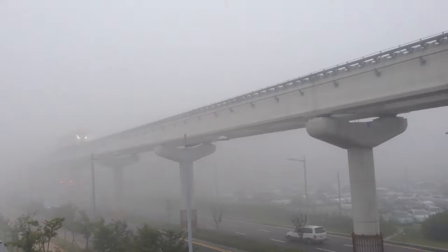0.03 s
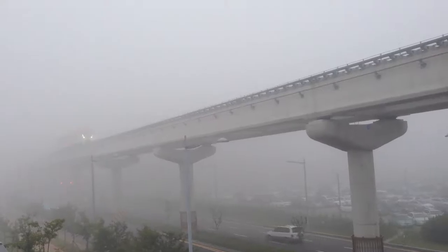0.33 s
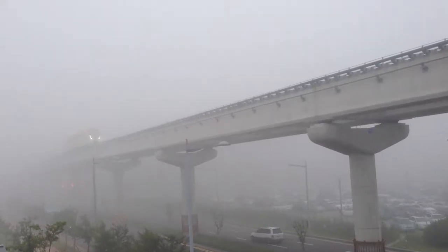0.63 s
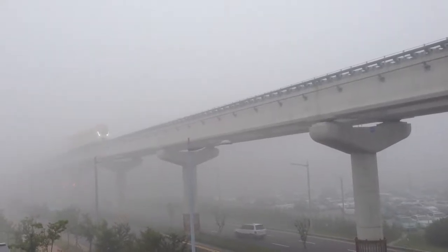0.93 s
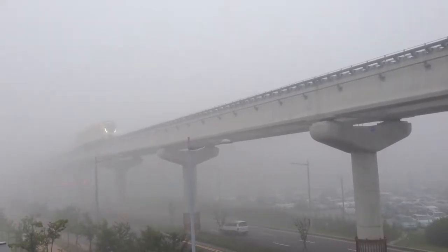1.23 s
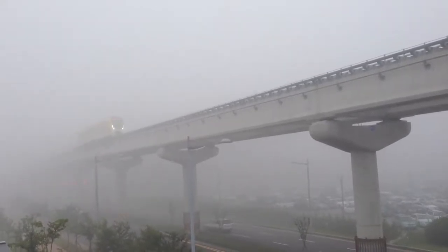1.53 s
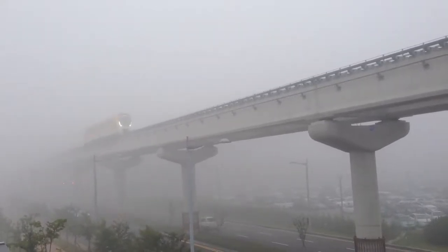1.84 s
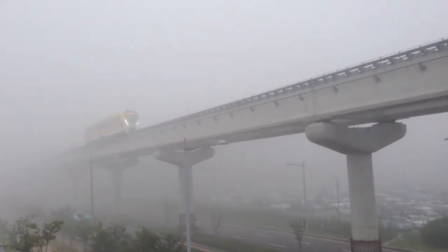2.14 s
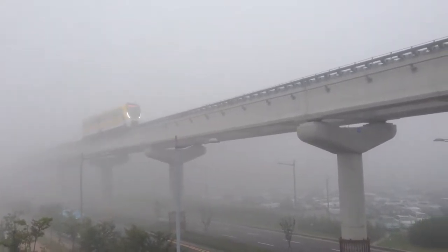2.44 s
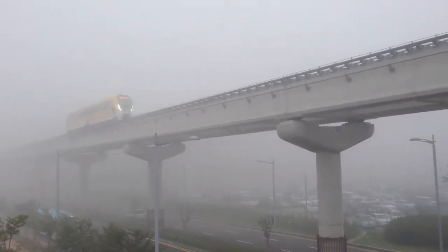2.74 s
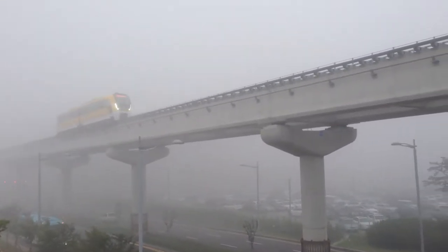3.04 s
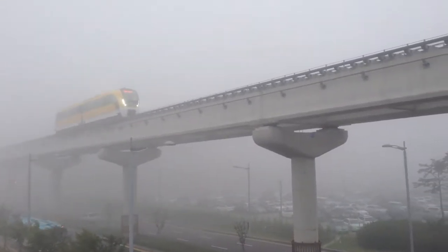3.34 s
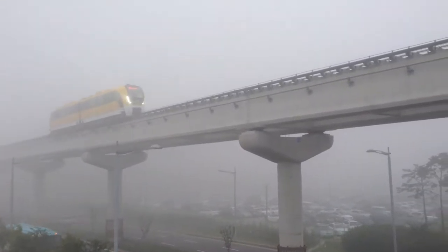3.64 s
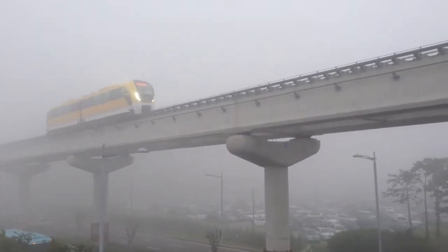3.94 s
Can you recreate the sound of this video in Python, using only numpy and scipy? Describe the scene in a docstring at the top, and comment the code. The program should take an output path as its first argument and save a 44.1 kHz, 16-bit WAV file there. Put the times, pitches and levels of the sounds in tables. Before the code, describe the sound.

A light train approaches on a raised track outdoors. At first a car's tyre hiss fades within a second into steady distant traffic. From about 1 second the train's rolling roar builds, with a low motor hum and wheels singing in surges. From 2.5 seconds it brightens with hiss, a thin high whine and faint squeaks, still growing at 4 seconds. Wind rumbles and bumps on the microphone throughout.

```python
"""Light train approaching in fog

A light train rolls closer on a viaduct: its roar grows and brightens, the motor hums, the wheels sing
on the track and a thin high whine breaks into squeaks. On the road beside it the tyre hiss of one car
fades into a steady rush of far traffic. Light wind rumbles and bumps on the microphone.
Rushes are coloured noise, hum and whine are narrow noise bands, squeaks and bumps are shaped sines."""
import sys
import numpy as np
from scipy import signal
from scipy.fft import rfft, irfft
from scipy.io import wavfile

SR = 44100
rng = np.random.default_rng(int(sys.argv[2]) if len(sys.argv) > 2 else 0)


def materialize(psi):
    """Save the field psi as 16-bit PCM at rate SR to the path in sys.argv[1].

    A 1-D psi becomes a single channel; in a 2-D psi each row is a channel.
    """
    bounded = np.clip(np.atleast_2d(psi).T, -1, 1)
    quanta = np.round(bounded * 32767).astype(np.int16)
    wavfile.write(sys.argv[1], SR, quanta)


N = 176400
T = np.arange(N) / SR


def from_db(db):
    """Decibels to gain."""
    return 10 ** (np.asarray(db) / 20)


def unit_rms(x):
    """Scale to rms 1."""
    return x / np.sqrt(np.mean(x ** 2) + 1e-20)


def automation(rows):
    """Breakpoints (time [s], values...) to one curve per value column, at every sample."""
    times, *columns = np.transpose(rows)
    return [np.interp(T, times, column) for column in columns]


def drift(rate_hz):
    """Smooth random wander of about rms 1, mostly slower than rate_hz."""
    hop, warm_up = 40, 2000
    pole = np.exp(-2 * np.pi * rate_hz * hop / SR)
    noise = rng.standard_normal(N // hop + warm_up + 2)
    slow = signal.lfilter([1], [1, -2 * pole, pole * pole], noise)[warm_up:]
    return np.interp(np.arange(N) / hop, np.arange(len(slow)), unit_rms(slow))


def rush(spectrum, flutter_db, flutter_hz):
    """Coloured noise whose octaves waver, partly together, in the moving air; rms 1."""
    hz, db = np.transpose(spectrum)
    octave = np.log2(np.maximum(np.fft.rfftfreq(N, 1 / SR), 1))
    low_cut_db = 18 * np.maximum(np.log2(hz[0]) - octave, 0)
    colour = from_db(np.interp(octave, np.log2(hz), db) - low_cut_db)
    noise = rfft(rng.standard_normal(N)) * colour
    together = drift(flutter_hz)
    out = np.zeros(N)
    for centre in range(4, 15):   # octave bands, 16 Hz to 16 kHz
        band = irfft(noise * np.maximum(1 - abs(octave - centre), 0), N)
        out += band * from_db(flutter_db * (together + drift(flutter_hz)))
    return unit_rms(out)


def narrow_noise(hz, width_hz):
    """A blurred tone: noise gathered around a pitch that may move; rms 1."""
    lowpass = signal.butter(3, width_hz / 2, fs=SR, output="sos")
    in_phase, quadrature = signal.sosfilt(lowpass, rng.standard_normal((2, N + SR)))[:, SR:]
    phase = 2 * np.pi * np.cumsum(hz * np.ones(N)) / SR
    return unit_rms(in_phase * np.cos(phase) + quadrature * np.sin(phase))


def train_roar():
    """The body of the train: a rolling roar that builds as it comes closer."""
    # colour of the roar (frequency [Hz], relative density [dB])
    spectrum = [(130, 3), (220, 3), (330, 2), (440, -3), (570, 1), (720, -2.5), (950, -2.5), (1200, -6),
                (1400, -7.5), (1650, -9), (2200, -16), (3000, -22), (5000, -36), (15000, -45)]
    # swell of the roar (time [s], level [dB])
    swell = [(.8, -49.5), (1.3, -45), (2, -41.5), (2.5, -41), (2.8, -38.5), (3.4, -38.5), (4, -38.5)]
    level_db, = automation(swell)
    return from_db(level_db) * rush(spectrum, flutter_db=1.07, flutter_hz=12.2)


def running_gear():
    """Bright hiss from the train's running gear, growing with the approach."""
    # colour of the hiss (frequency [Hz], relative density [dB])
    spectrum = [(1500, -47), (2300, 5), (2800, 3), (4300, 0.5), (6200, -3), (7500, -9), (10000, -12.5),
                (15000, -27)]
    # swell of the hiss (time [s], level [dB])
    swell = [(1.7, -66), (2.45, -62.5), (2.65, -57.5), (3, -56), (3.4, -57), (3.8, -52.5), (4, -52.5)]
    level_db, = automation(swell)
    return from_db(level_db) * rush(spectrum, flutter_db=1.0, flutter_hz=18)


def approach():
    """As the train nears, the track rings and a broad band brightens the roar."""
    # track resonances (centre [Hz], width [Hz], level at full swell [dB])
    resonances = [(1940, 140, -47), (430, 100, -47)]
    full_swell_s, rise_db_per_s = 4.11, 18.5   # still rising when the scene ends
    swell = from_db(-rise_db_per_s * np.maximum(full_swell_s - T, 0))
    ringing = sum(from_db(db) * narrow_noise(hz, width) for hz, width, db in resonances)
    brightness = from_db(-43) * narrow_noise(1950, width_hz=986)
    return swell * (brightness + ringing)


def motor_hum():
    """The motor's low, slightly sagging hum, with a breathier octave above it."""
    # fundamental (time [s], pitch [Hz], level [dB])
    fundamental = [(.1, 296.6, -54), (.6, 285.5, -44.5), (.72, 286.2, -51.5), (.9, 284.5, -46),
                   (1.15, 278.4, -54.5), (1.85, 276.9, -50.5), (2.6, 277.6, -51.5), (3.02, 279.8, -49),
                   (3.3, 277.6, -43), (3.6, 276.7, -51), (4, 280.6, -60)]
    # octave above (time [s], level [dB])
    octave_level = [(.1, -47.5), (.6, -62), (2.2, -64), (2.7, -50), (3.3, -50), (4, -68)]
    hz, hum_db = automation(fundamental)
    octave_db, = automation(octave_level)
    hum = from_db(hum_db) * narrow_noise(hz, width_hz=14.9)
    return hum + from_db(octave_db) * narrow_noise(2 * hz, width_hz=75)


def train_whine():
    """A thin, wandering whine on top of the train, wrapped in a band of hiss."""
    # whine (time [s], pitch [Hz], level of the core [dB])
    contour = [(1.8, 6300, -82), (2.25, 6195, -76), (2.48, 6240, -72), (2.7, 6240, -73), (2.86, 6122, -72),
               (3, 6080, -80), (3.4, 6150, -80), (3.8, 6250, -73), (4, 6200, -73)]
    hz, level_db = automation(contour)
    core = narrow_noise(hz, width_hz=150)
    halo = from_db(-1) * narrow_noise(6370, width_hz=840)
    return from_db(level_db) * (core + halo)


def wheel_song():
    """The wheels sing on the track in surges, creeping up in pitch."""
    # singing band (time [s], centre [Hz], level [dB])
    contour = [(.9, 1153, -57), (1.5, 1194, -49.5), (2.27, 1167, -53), (2.39, 1195, -45), (2.5, 1200, -56),
               (2.7, 1228, -48.5), (2.88, 1254, -56), (3.07, 1297, -45), (3.25, 1294, -55),
               (3.6, 1304, -50)]
    hz, level_db = automation(contour)
    return from_db(level_db) * narrow_noise(hz, width_hz=238)


def squeaks():
    """Faint, distant squeaks, each swelling and fading with an unsteady pitch; most glide."""
    # squeaks (peak time [s], level [dB], pitch [Hz], glide [Hz/s], swell half-width [s])
    cues = [(2.55, -59, 2700, 3002, .02), (2.87, -65.5, 5890, -800, .03), (2.944, -67, 6110, 0, .018),
            (3.152, -57, 3160, -2000, .014), (3.18, -71, 6000, 0, .025), (3.58, -55, 2970, -2, .014),
            (3.74, -63, 5820, 2000, 0.034), (3.795, -65, 6450, 2002, .022)]
    waver_hz = 54.7
    out = np.zeros(N)
    for peak_s, db, hz, glide, width_s in cues:
        pitch = hz + glide * np.clip(T - peak_s, -3 * width_s, 3 * width_s)
        phase = 2 * np.pi * np.cumsum(pitch + waver_hz * drift(rate_hz=70)) / SR
        swell = np.exp(-.5 * ((T - peak_s) / width_s) ** 2)
        out += from_db(db) * swell * unit_rms(np.sin(phase))
    return out


def wind_rumble():
    """Lumpy rumble of wind on the microphone, with brief gusts."""
    # colour of the rumble (frequency [Hz], relative density [dB])
    spectrum = [(22, -19), (35, -19), (50, -6), (75, 0.5), (110, 0), (150, -5.5), (200, -17.5), (400, -25),
                (1000, -50)]
    # rise and fall of the rumble (time [s], level [dB])
    surges = [(.15, -47), (.27, -37.5), (.48, -42.5), (.75, -41), (1.1, -39.5), (1.35, -43), (1.8, -40),
              (2.35, -44.5), (2.8, -40.5), (3.05, -45.5), (3.35, -37), (3.7, -47.5), (4, -39)]
    # gusts (peak time [s], level [dB], centre [Hz], swell half-width [s])
    gusts = [(0.248, -40, 140.3, 0.014), (0.286, -41, 62, 0.022), (0.723, -40, 80, 0.022),
             (1.22, -41, 89.7, .03), (1.45, -42.5, 154.8, 0.018), (2.293, -48, 329, 0.11),
             (3.2, -42, 65.2, 0.03), (3.298, -37.5, 145.1, 0.058), (3.624, -41, 170, 0.05),
             (3.906, -34.5, 89.7, 0.041), (3.94, -38.5, 179.7, 0.037)]
    level_db, = automation(surges)
    out = from_db(level_db) * rush(spectrum, flutter_db=0.5, flutter_hz=11)
    for peak_s, db, hz, width_s in gusts:
        swell = np.exp(-.5 * ((T - peak_s) / width_s) ** 2)
        swell_rms = np.sqrt(np.mean(swell ** 2))
        gust = unit_rms(swell * narrow_noise(hz, width_hz=0.6 * hz))
        out += from_db(db) * swell_rms * gust
    return out


def wind_bumps():
    """Wind knocks on the microphone: dull bumps, each a few cycles of a low sine."""
    # bumps (onset [s], envelope peak [dB], pitch [Hz])
    cues = [(.232, -29, 165), (.24, -30, 105), (1.142, -32.5, 125), (1.195, -33, 60.6),
            (1.42, -28.5, 149.6), (2.617, -29, 141.5), (2.797, -22, 200), (2.797, -28, 120),
            (3.307, -29, 110), (3.549, -27.5, 180), (3.574, -28, 154), (3.779, -27, 183),
            (3.896, -28, 109.7)]
    decay_cycles = 0.61
    out = np.zeros(N)
    for onset_s, db, hz in cues:
        cycles = np.maximum(T - onset_s, 0) * hz
        age = cycles / decay_cycles
        envelope = (age / 2) ** 2 * np.exp(2 - age)   # peaks at 1 when age is 2
        out += from_db(db) * envelope * np.sin(2 * np.pi * cycles)
    return out


def departing_car():
    """Tyre hiss holds for a moment, then dies away as the car drives off."""
    # colour of the tyres (frequency [Hz], relative density [dB])
    spectrum = [(300, 10), (600, -3), (920, 6), (1250, -1), (1600, -5), (2200, -3), (4200, -11),
                (6000, -19.5), (9000, -25.5), (15000, -35)]
    start_db, hold_s, fade_db_per_s = -40, 0.22, 36
    level_db = start_db - fade_db_per_s * np.maximum(T - hold_s, 0)
    return from_db(level_db) * rush(spectrum, flutter_db=0.4, flutter_hz=17)


def far_traffic():
    """A steady bed of distant traffic with the deep bass rolled off."""
    # colour of the traffic (frequency [Hz], relative density [dB])
    spectrum = [(130, -3), (240, -1.5), (400, -9), (600, -9.5), (1050, -9), (1300, -10), (1550, -12.5),
                (2200, -16.5), (3300, -23), (4200, -26), (6000, -33), (8000, -38.5), (11000, -43),
                (15000, -51)]
    low_cut = signal.butter(2, 125, "high", fs=SR, output="sos")
    return from_db(-41) * signal.sosfilt(low_cut, rush(spectrum, flutter_db=0.78, flutter_hz=13.0))


def scene():
    """Road, train and wind mixed at one microphone."""
    road = far_traffic() + departing_car()
    rolling = train_roar() + running_gear() + approach()
    tones = motor_hum() + train_whine() + wheel_song() + squeaks()
    wind = wind_rumble() + wind_bumps()
    return (rolling + tones + wind + road)[None]


def record(dry):
    """The microphone has a narrow hollow in the upper mids; the sound cuts in; the top is cut steeply."""
    hollow_hz, half_width_hz, hollow_db = 2810, 244, -3.5
    start_s, fade_in_s, cutoff_hz = .083, .002, 15300
    hz = np.fft.rfftfreq(N, 1 / SR)
    hollow = from_db(hollow_db * np.exp(-.5 * ((hz - hollow_hz) / half_width_hz) ** 6))
    coloured = irfft(rfft(dry) * hollow, N)
    fade_in = np.clip((T - start_s) / fade_in_s, 0, 1)
    high_cut = signal.ellip(12, .1, 70, cutoff_hz, fs=SR, output="sos")
    return signal.sosfilt(high_cut, coloured * fade_in)


dry = scene()
out = record(dry)
materialize(out)
```